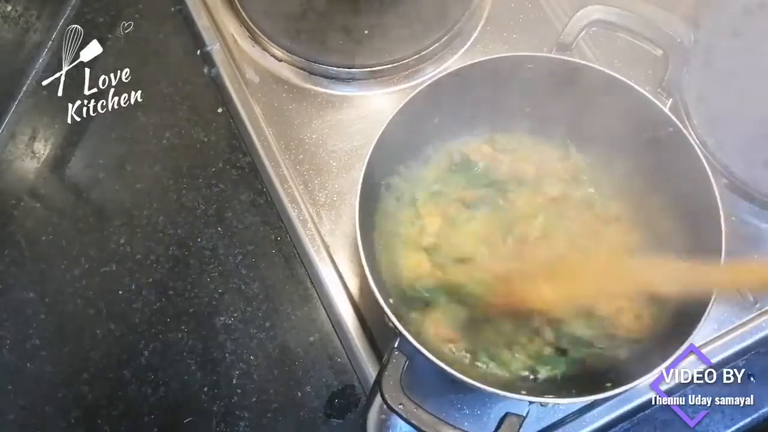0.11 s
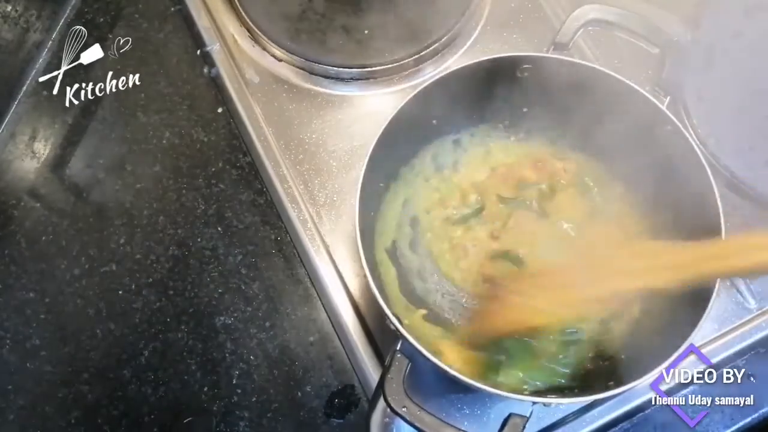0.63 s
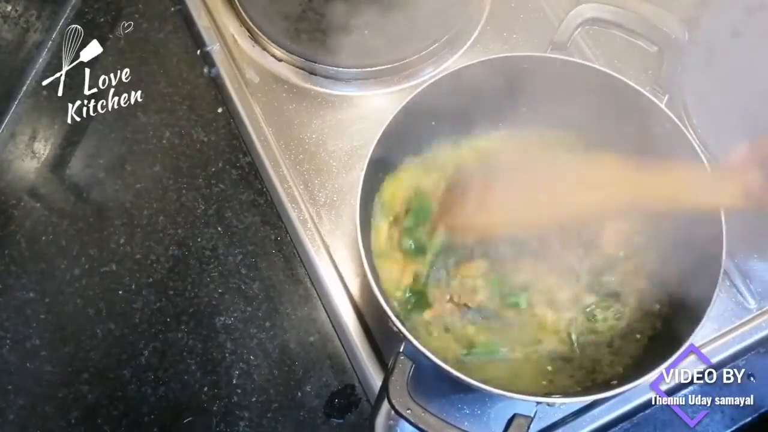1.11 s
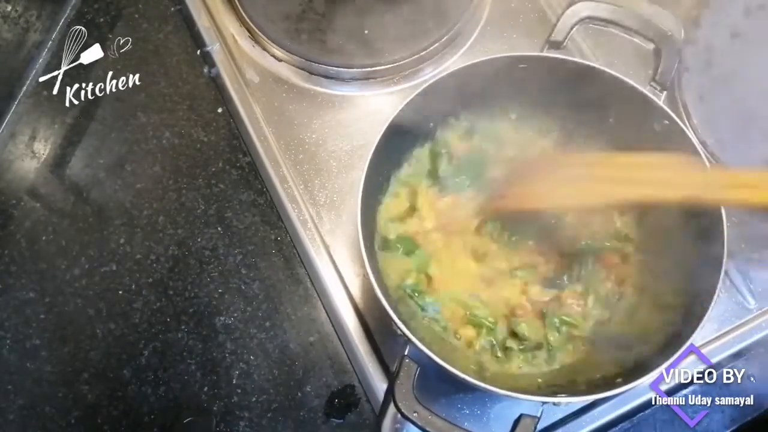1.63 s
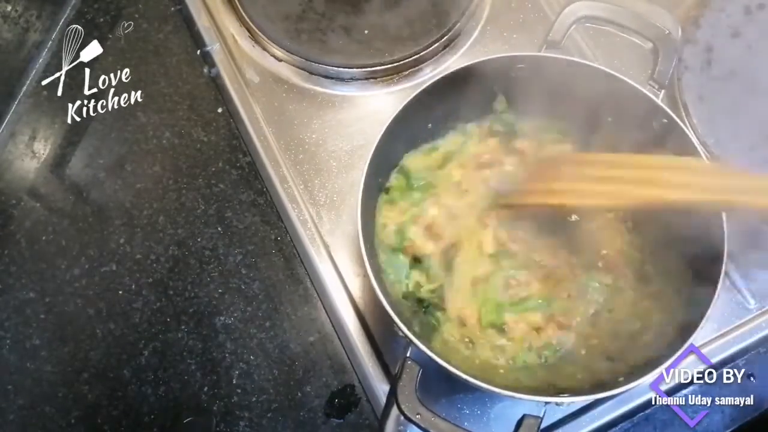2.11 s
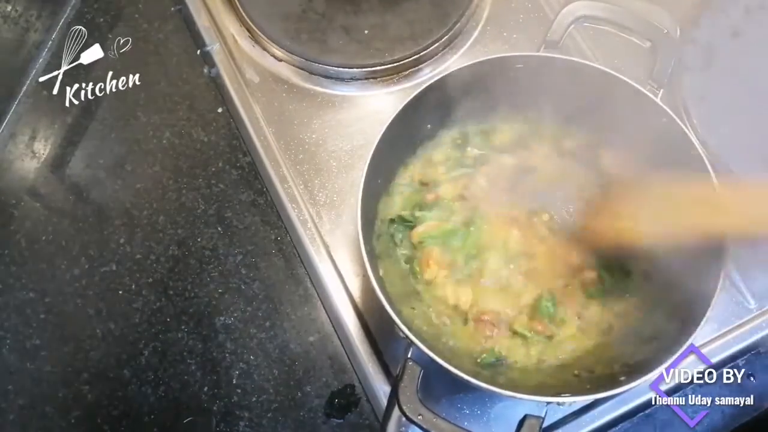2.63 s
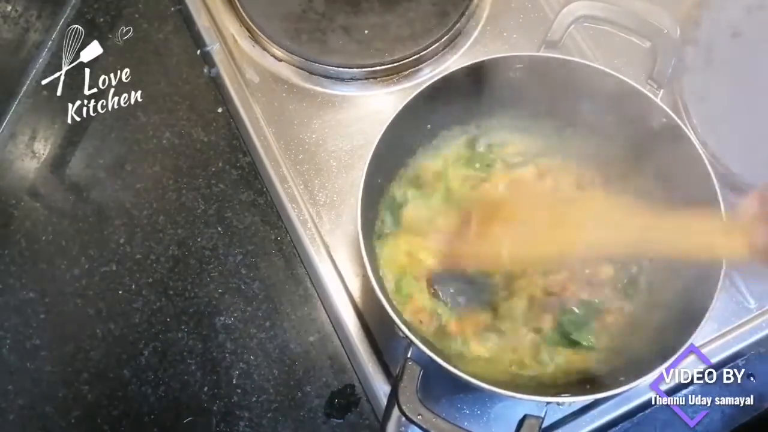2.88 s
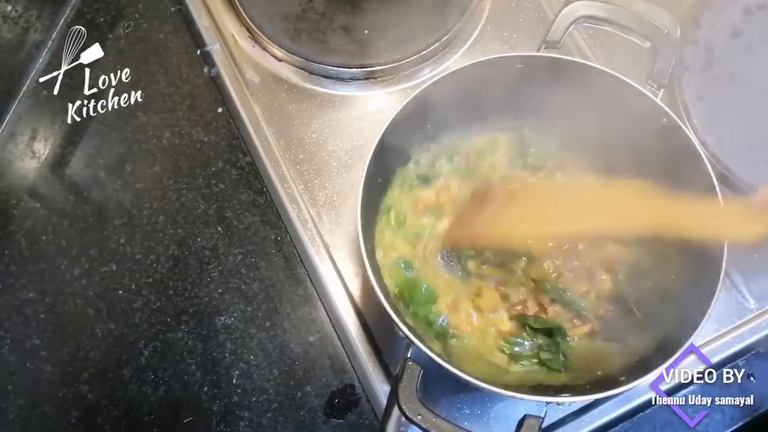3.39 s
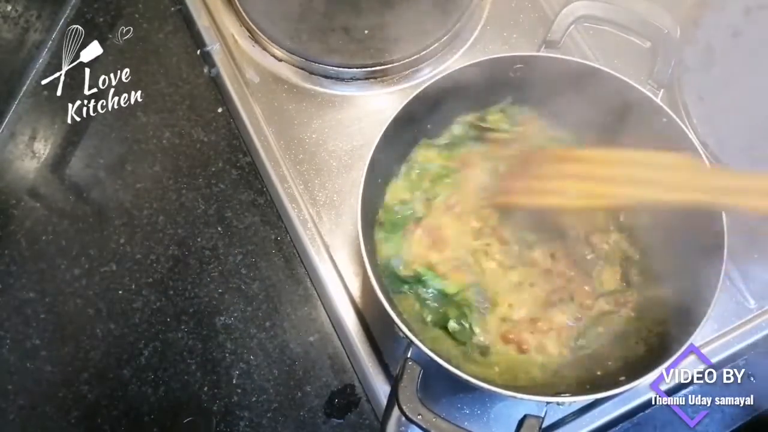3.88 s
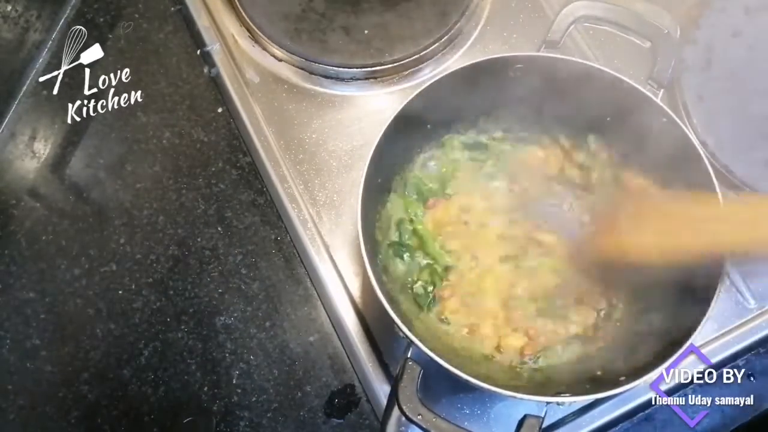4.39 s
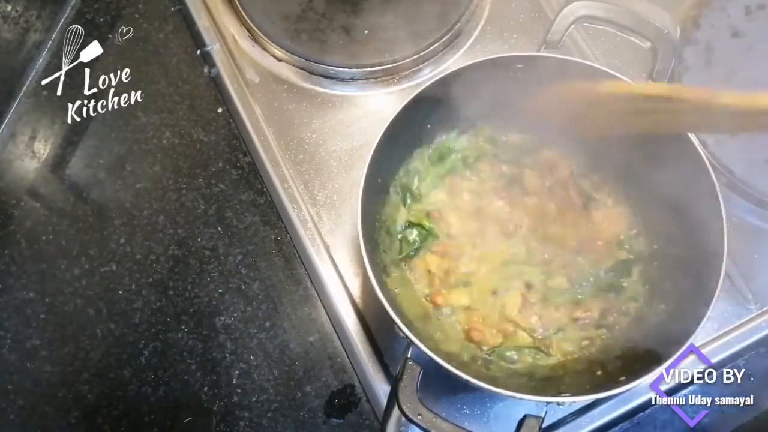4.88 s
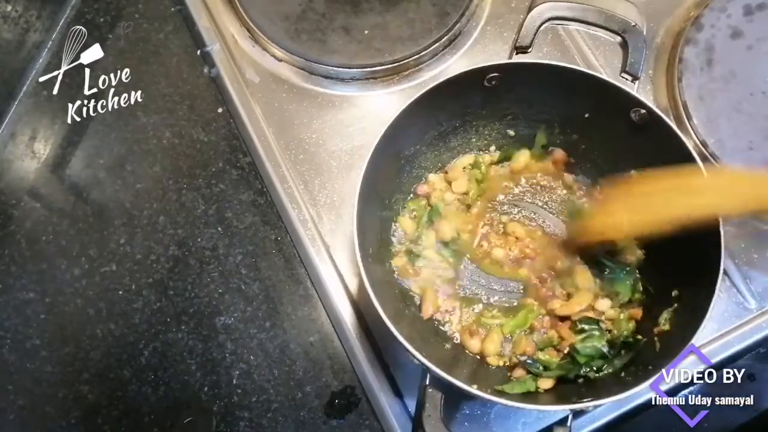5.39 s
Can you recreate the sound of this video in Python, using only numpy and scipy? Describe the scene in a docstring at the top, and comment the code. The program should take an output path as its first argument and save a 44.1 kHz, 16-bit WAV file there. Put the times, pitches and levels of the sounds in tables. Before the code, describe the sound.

Wet vegetables hiss loudly in hot oil, slowly weakening and fading to silence, then a drier, quieter crackling fades in with spatula scrapes and knocks.

```python
"""At first wet vegetables hiss in hot oil: random bubble clicks and steam noise, split into bands from gurgle to fizz.
Single bubbles burst as short tones, the spatula knocks the ringing pan, and thumps shake its stand over a low roar.
The hiss slowly weakens and is faded out, then a drier, quieter frying of coarser clicks is faded in.
At the end the spatula scrapes and knocks the pan. Two unlike microphones hear it all, with the room's tail."""
import sys
import numpy as np
from scipy import signal
from scipy.fft import rfft, irfft, next_fast_len
from scipy.io import wavfile
from scipy.ndimage import uniform_filter1d, map_coordinates

SR = 44100
rng = np.random.default_rng(int(sys.argv[2]) if len(sys.argv) > 2 else 0)


def dump(signal):
    """Clip the signal to [-1, 1] and save it as 16-bit WAV at the path in sys.argv[1]."""
    limited = np.clip(np.atleast_2d(signal).T, -1, 1)
    pcm = np.round(limited * 32767).astype(np.int16)
    wavfile.write(sys.argv[1], SR, pcm)


def ratio_of_db(decibels):
    """Turn decibels (scalar or array-like) into linear amplitude factors; 0 dB maps to 1."""
    return 10 ** (np.asarray(decibels, float) / 20)


N = 243431  # length in samples
CUT_S, FADE_S = 5.068, 0.5  # moment the wet stage gives way to the drier one, length of each fade (s)

# Borders between the layers of the frying: floor of the gurgle, gurgle to bubbling,
# bubbling to hiss, hiss to fizz [f/Hz each]
LAYER_EDGES = (760, 1120, 2300, 7600)


def boil():
    """The wet stage: big bubbles sound low, steam jets in the middle, fine spray on top; all weaken with the boil."""
    # Strength of the boil [t/s, hiss level/dB]
    boil_strength = [(0, -31.5), (.45, -32.5), (.7, -33), (1.2, -33), (1.45, -32.5), (2.2, -34),
                     (2.45, -33.5), (2.6, -36.5), (2.67, -34), (3.0, -36.5), (3.3, -36.5), (3.4, -37),
                     (3.6, -37.3), (3.75, -39), (4.1, -39), (4.2, -39), (4.6, -39.5)]
    # Fizz, bubbling, gurgle, roar [level at the strongest boil/dB, change per dB of boil/dB]
    layer_levels = [(-32.5, 1.0567), (-49.5, 1.08), (-56.5, .5), (-63, 1.08)]
    # Stretches where the 1120 to 2300 Hz band is heard, with dropouts between [start t/s, length/s]
    band_open_1120_2300 = [(0, 3.716), (3.702, 0.15), (3.86, 0.051), (3.941, 0.25), (4.23, 0.046),
                           (4.398, 0.13), (4.67, 0.03), (4.84, 0.053), (4.935, .06)]
    # Stretches where the 760 to 1120 Hz band is heard, with dropouts between [start t/s, length/s]
    band_open_760_1120 = [(0, 2.4), (2.55, 0.22), (2.8, 0.12), (3.147, 0.026), (3.241, 0.055),
                          (3.378, 0.046), (3.56, 0.085), (4.143, 0.028), (4.256, 0.042), (4.633, 0.081),
                          (4.745, 0.041), (4.955, .06)]
    # Stretches between dropouts of the lowest band [start t/s, length/s]
    lows_open = [(0, 0.84), (.855, .23), (1.13, .03), (1.225, 0.26), (1.53, 0.23), (1.785, 0.14),
                 (1.945, .32), (2.315, .05), (2.397, 0.081), (2.558, 0.023), (2.628, 0.038), (2.702, 0.032),
                 (2.792, 0.065), (3.372, 0.056), (3.555, .064), (4.141, 0.022), (4.95, .05)]

    hiss_db, = curves(boil_strength)
    weakening_db = hiss_db - hiss_db.max()
    fizz_db, bubbling_db, gurgle_db, roar_db = (db + slope * weakening_db for db, slope in layer_levels)

    wet = sizzle(lambda hz: 0, spread_db=2.1, steam_db=1.0, patchy_db=0.8, flutter_db=0.1)
    over = [above(wet, hz) for hz in LAYER_EDGES]
    gurgle, bubbling, hiss, fizz = over[0] - over[1], over[1] - over[2], over[2] - over[3], over[3]

    high = ratio_of_db(hiss_db) * unit(hiss)
    high += ratio_of_db(fizz_db + 0.67 * wobble(13)) * unit(fizz)
    high *= ratio_of_db(0.54 * wobble(17))
    low = ratio_of_db(bubbling_db) * heard(band_open_1120_2300) * unit(patchy(bubbling, patchy_db=2.0))
    low += ratio_of_db(gurgle_db) * heard(band_open_760_1120) * unit(patchy(gurgle, patchy_db=4.0))

    dips_db = -16 * np.clip(wobble(36) - 1.1, 0, 1)  # short random dropouts of the lowest band
    roar_gain = ratio_of_db(roar_db + 1.55 * wobble(18) + dips_db) * heard(lows_open)
    return high + low + roar_gain * rumble()


def fry():
    """The drier stage: coarser crackle with less steam noise, a low rumble and the spatula's scrapes."""
    # Colour change once the water is gone [f/Hz, level/dB]
    drier_colour = [(500, -0.5), (2000, 8), (6000, 1.5), (10000, -6.5), (12500, -6), (15000, -6.5)]
    # The frying eases off [t/s, sizzle level/dB, treble level/dB]
    fry_levels = [(5.07, -38, -48), (5.18, -41.5, -45.5), (5.23, -38, -51.5), (5.29, -39, -50),
                  (5.4, -42, -46.5), (5.46, -42, -48), (5.52, -45, -47)]
    # Stretches where the crackle below 2300 Hz is heard, with dropouts between [start t/s, length/s]
    crackle_lows_open = [(5.1, .145), (5.3, .175), (5.512, .05)]

    crackle = sizzle(lambda hz: along(drier_colour, hz), spread_db=3.5, steam_db=-8, patchy_db=2.5, flutter_db=1.85)
    upper, fizz = above(crackle, LAYER_EDGES[2]), above(crackle, LAYER_EDGES[3])
    sizzle_db, fizz_db = curves(fry_levels)
    high = ratio_of_db(sizzle_db) * unit(upper - fizz) + ratio_of_db(fizz_db) * unit(fizz)
    low = ratio_of_db(-52) * heard(crackle_lows_open) * unit(crackle - upper)
    low += ratio_of_db(-59) * unit(patchy(rumble(), patchy_db=4.0))
    return high + low + scrape()


def scrape():
    """The dragged spatula slips in many tiny jerks, each of which sets the pan ringing."""
    # Spatula strokes on the bare pan [start t/s, length/s, level/dB]
    stroke_rows = [(5.143, 0.1, -43), (5.286, 0.13, -43.5)]
    slips = bursts(count=3000, spread_db=0.0, lag_s=0.00017, scatter_s=0.00005)
    ringing = unit(filtered(kitchen(slips, wet_db=-4.5), pan_ring))
    ringing *= ratio_of_db([[2.5], [-2.5]])  # stronger on the left
    strokes = sum(ratio_of_db(db) * stretch(s, length, edge_s=0.033) for s, length, db in stroke_rows)
    return strokes * ratio_of_db(2.7 * wobble(30)) * ringing


def sizzle(colour_db, spread_db, steam_db, patchy_db, flutter_db):
    """Bubble clicks on smooth steam noise, in the room, through the microphone ports."""
    # The hiss as each microphone port colours it [f/Hz, left level/dB, right level/dB]
    port_colours = [(518, -46.5, -51), (817, -35, -30.5), (869, -18, -19.5), (935, -12, -20),
                    (1092.5, -28, -38), (1209, -15.5, -12), (1257, -21, -24), (1585, -9, -19.5),
                    (2205, -19, -21.5), (2970, -12, -13), (4040, -18.5, -20.5), (4524, -10.5, -22.5),
                    (5330, -1.5, -12), (5900, 0.5, -17.5), (6560, -4, -12), (7600, -14.5, -15.5),
                    (9570, -17.5, -5.5), (11650, -15.5, -9), (12800, -18, -13.5), (15000, -11, -15),
                    (16600, -25, -18.5)]
    steam = ratio_of_db(steam_db) * rng.standard_normal((2, N))
    clicks = bursts(count=60000, spread_db=spread_db, lag_s=0.00018, scatter_s=0.00008)
    mix = patchy(kitchen(clicks, wet_db=-5.5) + steam, patchy_db)
    mix = mix * ratio_of_db(flutter_db * (wobble(3.8) + 0.28 * wobble(9)))
    return unit(filtered(mix, lambda hz: ratio_of_db(along(port_colours, hz) + colour_db(hz))))


def bursts(count, spread_db, lag_s, scatter_s):
    """Clicks of random time, size and sign; each comes from its own spot, so it reaches the left port with its own lag."""
    when, size, sign, spot = rng.random((count, 4)).T
    click = np.sign(sign - 0.5) * ratio_of_db(-spread_db * np.log(size + 0.00096))  # with a spread, a few are much louder
    right = when * N
    left = right + SR * (lag_s + scatter_s * (2 * spot - 1))
    ports = []
    for at in (left, right):
        sample = np.clip(np.round(at), 0, N - 1).astype(int)
        ports.append(np.bincount(sample, click, N))
    return unit(np.array(ports))


def patchy(x, patchy_db):
    """Random patches of time and frequency get louder and softer."""
    z = signal.stft(x, nperseg=512)[2]
    field = uniform_filter1d(rng.standard_normal(z.shape[1:]), size=8, axis=0)
    field = uniform_filter1d(field, size=10, axis=1)
    return signal.istft(z * ratio_of_db(patchy_db * unit(field)), nperseg=512)[1][:, :N]


def pan_ring(f):
    """The pan's resonances as a filter: each one rings after a push, with signs alternating from row to row."""
    # Resonances of the pan [f/Hz, width/Hz, level/dB]
    pan_modes = [(940, 150, -19.5), (1390, 160, -20.5), (1368, 53, -6), (1565, 89, -5), (2460, 330, -14.5),
                 (2620, 210, -16), (3260, 150, -9.5)]
    response = 0
    for k, (centre, width, db) in enumerate(pan_modes):
        push = 1j * f * width
        response = response + (-1) ** k * ratio_of_db(db) * push / (centre * centre - f * f + push)
    return response


def knocks():
    """The spatula catches on the pan: very short noise strikes make the pan ring."""
    # Knocks [t/s, level/dB, left minus right level/dB]
    knock_rows = [(0.501, -36, 0), (5.294, -38, 4), (5.304, -35, 4), (5.32, -33, -4), (5.336, -29, -1),
                  (5.352, -37, -3), (5.4, -28, 5), (5.409, -29, 3)]
    out, t = np.zeros((2, N + SR)), np.arange(SR // 3) / SR
    for s, db, side_db in knock_rows:
        strike = rng.standard_normal(len(t)) * np.exp(-t / 0.001)
        add(out, s, ratio_of_db(db) * strike, side_db)
    return filtered(out[:, :N], pan_ring)


def spits():
    """Large bubbles burst: each is a rough tone at its own pitch that dies away within milliseconds."""
    # Bursts [t/s, level/dB, left minus right level/dB, f/Hz, time to fall to 1/e/s]
    spit_rows = [(0.123, -36, 9.5, 2710, 0.006), (1.4693, -26, 4, 5900, 0.00085),
                 (5.375, -33, -3, 9900, 0.0061)]
    out, t = np.zeros((2, N + SR)), np.arange(SR // 3) / SR
    for s, db, side_db, hz, life_s in spit_rows:
        rough = 1 + 0.66 * uniform_filter1d(rng.standard_normal(len(t)), size=12)
        envelope = np.exp(-t / life_s) * (1 - np.exp(-t / 0.00044))
        add(out, s, ratio_of_db(db) * rough * np.sin(2 * np.pi * hz * t) * envelope, side_db)
    return out[:, :N]


def thumps():
    """The pan rocks on its stand, which answers with a few low tones that die away."""
    # Thumps [t/s, level/dB, extra level of the upper tones/dB]
    thump_rows = [(0.507, -38, 1.5), (0.59, -39.5, -6), (1.202, -50, 15), (1.578, -59, -8),
                  (2.571, -53, 12.5), (3.39, -46.5, -14), (3.568, -45, -12.5), (4.151, -51.5, -19),
                  (4.96, -46.5, -23), (5.249, -50, 10), (5.368, -41, -13)]
    # Tones of the stand [f/Hz, level/dB, time to fall by 60 dB/s]
    stand_modes = [(55.7, -9, 0.18), (98.7, -6.5, 0.064), (252, -5.5, 0.065), (510, -25, 0.073)]
    out, t = np.zeros((2, N + SR)), np.arange(SR // 3) / SR
    for s, db, upper_db in thump_rows:
        ring = np.zeros(len(t))
        for hz, mode_db, t60 in stand_modes:
            decay = ratio_of_db(mode_db + upper_db * (hz > 170) - 60 * t / t60)
            ring += decay * np.sin(2 * np.pi * hz * t)
        add(out, s, ratio_of_db(db) * ring * (1 - np.exp(-t / 0.014)), side_db=4.5)
    return out[:, :N]


def taps():
    """All single events together, with the room's tail."""
    return kitchen(knocks() + spits() + thumps(), wet_db=-13.0)


def rumble():
    """Low burner roar and bumps of the pan on its stand: wobbling low noise, partly shared by the ports."""
    # Colour of the rumble [f/Hz, level/dB]
    rumble_colour = [(20, -12.5), (50, -8), (100, -1), (170, -10), (250, -7), (330, -10), (800, -8.5),
                     (1000, -70)]
    shared, own = rng.standard_normal(N), rng.standard_normal((2, N))
    low = filtered(shared + own, lambda hz: ratio_of_db(along(rumble_colour, hz)))
    return unit(low * ratio_of_db([[3.2], [-3.2]]) * ratio_of_db(2.9 * wobble(12.0)))  # stronger on the left


def kitchen(x, wet_db):
    """Each port hears its own tail of the room, treble dying first; a new random tail is drawn every quarter second."""
    # How long the room rings [f/Hz, time to fall by 60 dB/s]
    room_decay = [(200, 0.66), (2000, 0.46), (10000, 0.06)]
    out, step = np.pad(x, ((0, 0), (0, SR))), SR // 4
    for start in range(0, N, step):
        hz, t, z = signal.stft(rng.standard_normal((2, SR // 3)), SR, nperseg=256)
        decay = ratio_of_db(-60 * t / along(room_decay, hz)[0][:, None])
        tail = signal.istft(z * decay, SR, nperseg=256)[1]
        wet = signal.fftconvolve(x[:, start:start + step], tail / np.linalg.norm(tail[0]), axes=1)
        out[:, start:start + wet.shape[1]] += ratio_of_db(wet_db) * wet
    return out[:, :N]


def gated(x, drift_db, ease_db):
    """Each port's weak bands are muted, frame by frame; the gate eases while the lowest band is open."""
    # Muting threshold before drift and easing [f/Hz, left level per Hz/dB, right level per Hz/dB]
    thresholds = [(85, -99, -99), (458, -101, -102), (984, -92, -90), (2029, -83, -84.5),
                  (4370, -84.5, -86), (6200, -84, -98), (9200, -86.5, -96), (12100, -84.5, -88),
                  (15500, -88, -87.5)]
    # Edges of the gate's bands [f/Hz each]
    band_edges = [0, 170, 800, 1050, 1300, 1470, 1650, 1850, 2100, 2300, 2600, 2900, 3500, 3800, 4200, 4700,
                  5400, 6200, 7000, 7700, 8400, 9100, 9800, 10500, 11200, 11900, 12600, 13300, 14200, 15300,
                  23000]
    hz, t, z = signal.stft(x, SR, window="cosine", nperseg=2048, scaling="psd")
    band = np.searchsorted(band_edges, hz, side="right") - 1
    member = band == np.arange(len(band_edges) - 1)[:, None]
    share = member / member.sum(axis=1, keepdims=True)  # averages the power inside each band
    level_db = 10 * np.log10(2 * share @ np.abs(z) ** 2 + 1e-20)
    centre = np.convolve(band_edges, [0.5, 0.5], "valid")
    drift = drift_db * uniform_filter1d(rng.standard_normal((2, 1, len(t))), size=2, axis=2)
    over_db = level_db - along(thresholds, centre)[:, :, None] - drift
    is_open = over_db + ease_db * (over_db[:, :1] > 0) > 0
    is_open[:, 0] = over_db[:, 0] > 0
    return signal.istft(z * is_open[:, band], SR, window="cosine", nperseg=2048, scaling="psd")[1][:, :N]


def unit(x):
    """Scaled to rms 1."""
    return x / np.sqrt(np.mean(x ** 2) + 1e-20)


def along(points, hz):
    """Columns of (Hz, value, ..) points, read off at hz on a log axis."""
    f, *cols = np.transpose(points)
    return np.array([np.interp(np.log(hz + 1), np.log(f + 1), c) for c in cols])


def curves(rows):
    """One value per sample for each column after the time."""
    s, *cols = np.transpose(rows)
    return [np.interp(np.arange(N) / SR, s, c) for c in cols]


def wobble(rate):
    """A smooth random curve through rate random values a second, at most 40."""
    knots = rng.standard_normal(int(N * 40 / SR) + 4)
    return map_coordinates(knots, [np.arange(N) * min(rate, 40) / SR])


def filtered(x, response):
    """x times a complex response of frequency."""
    m = next_fast_len(N + SR // 2)
    return irfft(rfft(x, m) * response(np.fft.rfftfreq(m, 1 / SR)), m)[..., :N]


def above(x, edge_hz):
    """The part of x over a steep edge."""
    return filtered(x, lambda hz: 1 - 1 / (1 + (hz / edge_hz) ** 20))


def add(out, s, sound, side_db):
    """Mixes a sound into both ports at time s, left over right by side_db."""
    out[:, round(s * SR):][:, :len(sound)] += ratio_of_db(side_db * np.array([[0.5], [-0.5]])) * sound


def stretch(start_s, length_s, edge_s):
    """Gain of 1 during a stretch of time, rising just before it and falling just after it."""
    t = np.arange(N) / SR - start_s
    return np.clip(np.minimum(t, length_s - t) / edge_s + 1, 0, 1) ** 2


def heard(stretches):
    """Gain that is open during each stretch."""
    return np.max([stretch(s, length, edge_s=0.0047) for s, length in stretches], axis=0)


def scene():
    """The wet stage before the cut, the drier one after, and the single events over both."""
    return np.where(np.arange(N) < CUT_S * SR, boil(), fry()) + taps()


def band_limit(x):
    """A steep low-pass at the top of the band."""
    return signal.sosfilt(signal.butter(12, 15960, fs=SR, output="sos"), x)


def record(dry):
    """Weak bands are muted; a straight fade runs down to silence at the cut and up again."""
    fade = np.clip(np.abs(np.arange(N) / SR - CUT_S) / FADE_S, 0, 1)
    mix = gated(dry, drift_db=1.5, ease_db=1.0) * fade
    return band_limit(mix)


dry = scene()
out = record(dry)
dump(out)
```